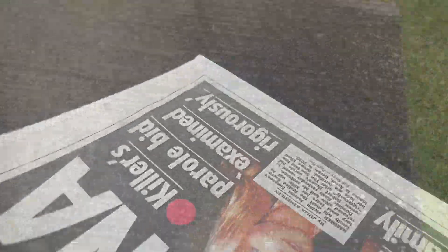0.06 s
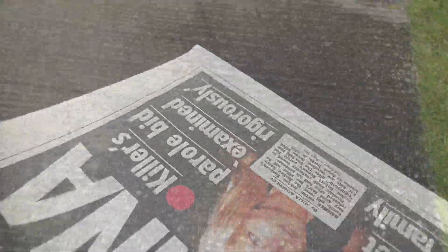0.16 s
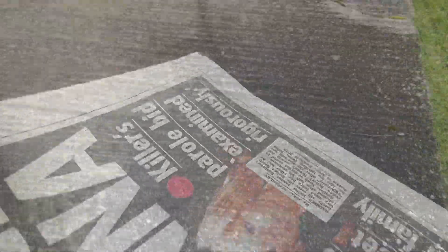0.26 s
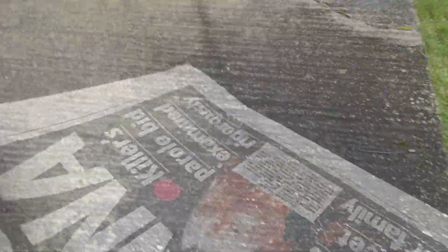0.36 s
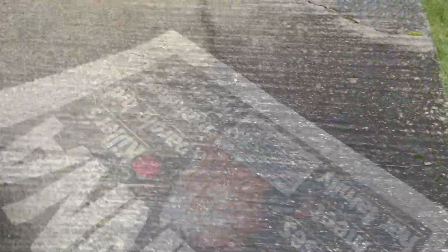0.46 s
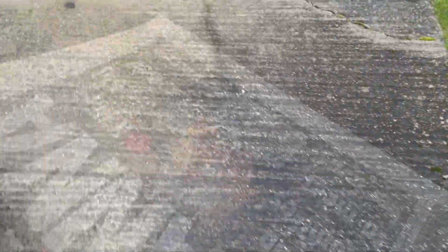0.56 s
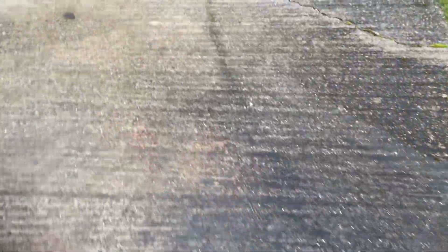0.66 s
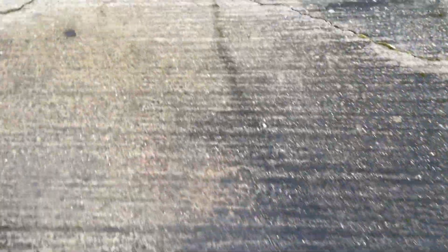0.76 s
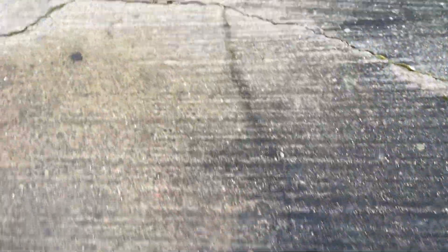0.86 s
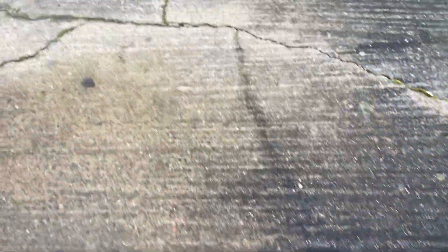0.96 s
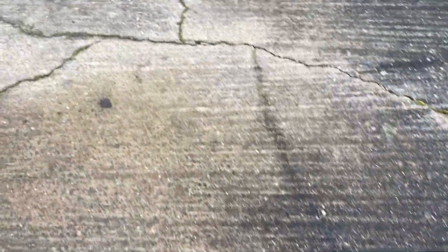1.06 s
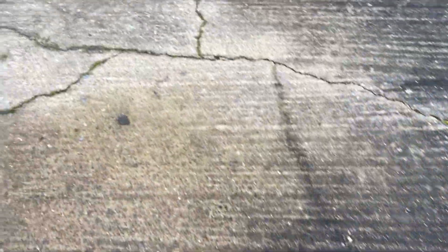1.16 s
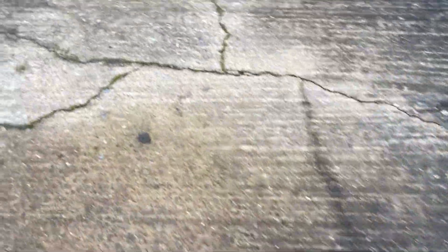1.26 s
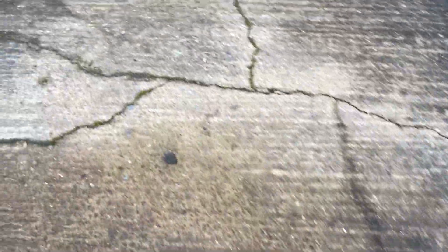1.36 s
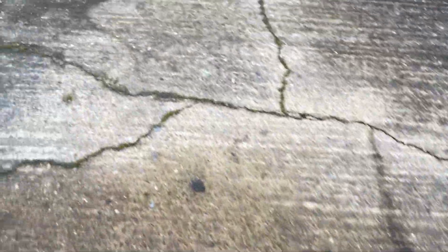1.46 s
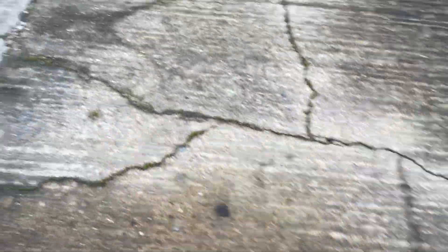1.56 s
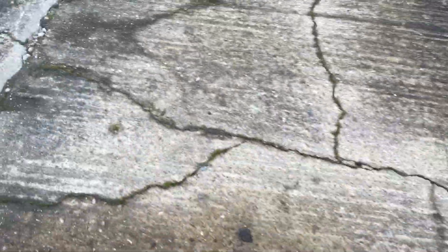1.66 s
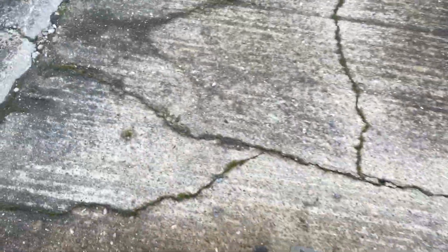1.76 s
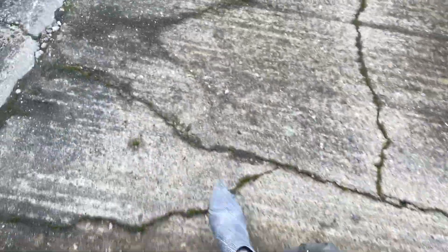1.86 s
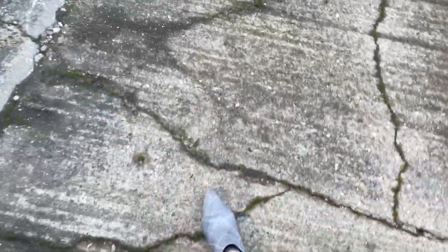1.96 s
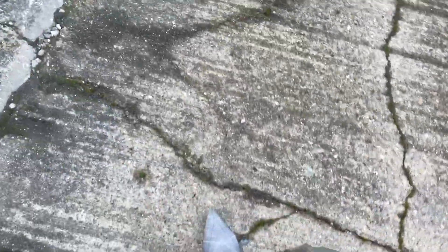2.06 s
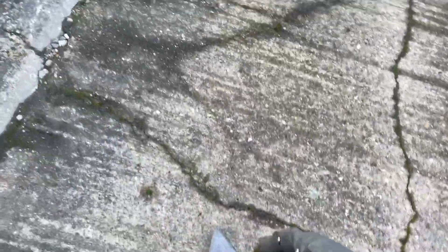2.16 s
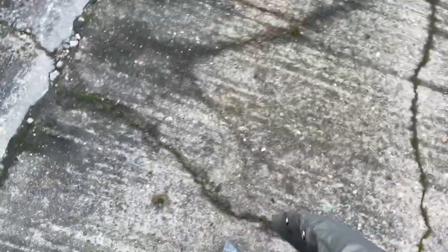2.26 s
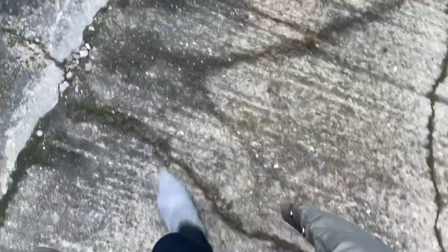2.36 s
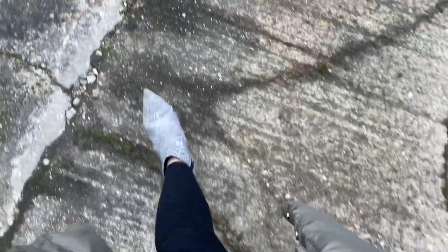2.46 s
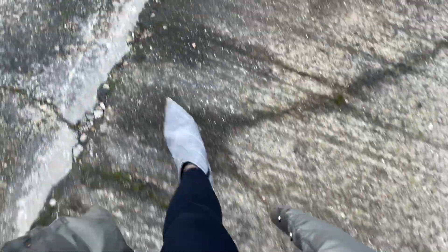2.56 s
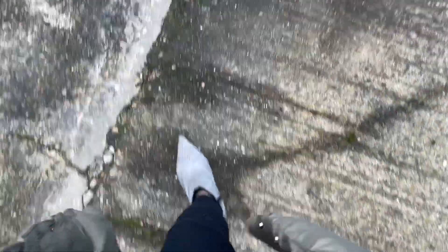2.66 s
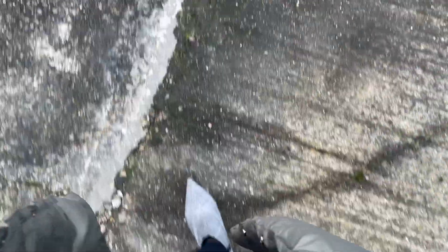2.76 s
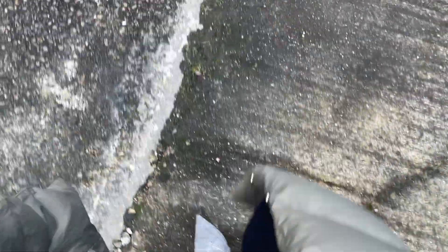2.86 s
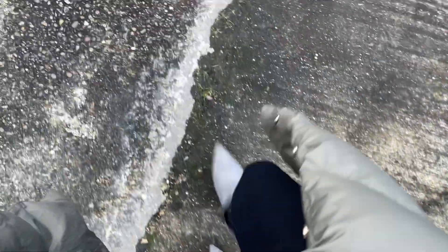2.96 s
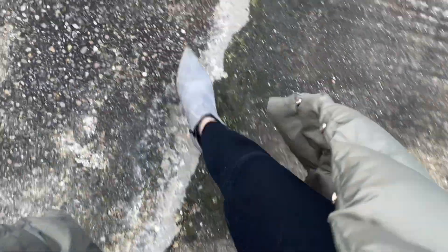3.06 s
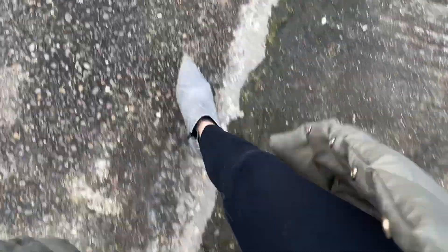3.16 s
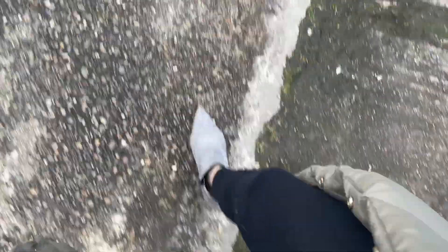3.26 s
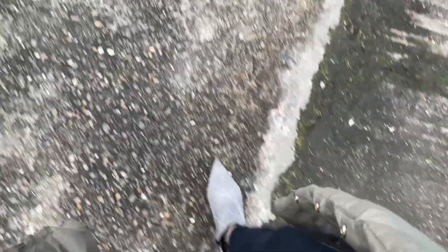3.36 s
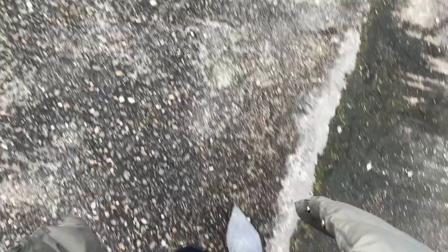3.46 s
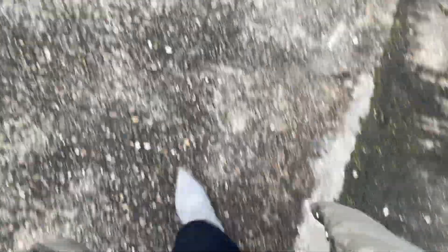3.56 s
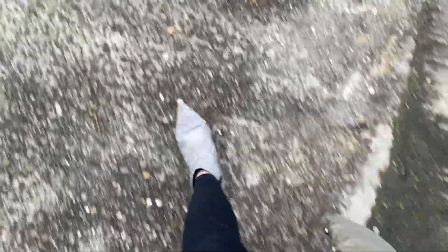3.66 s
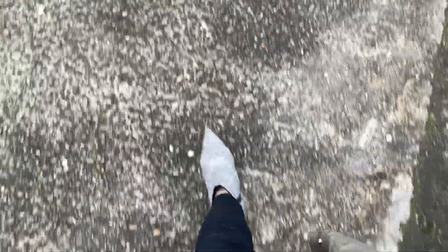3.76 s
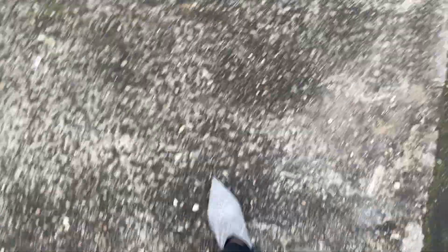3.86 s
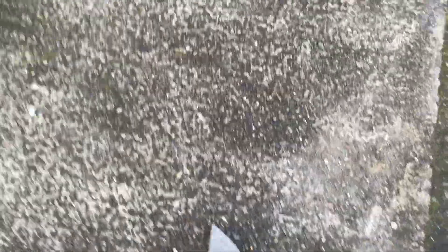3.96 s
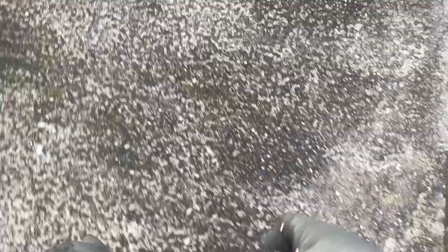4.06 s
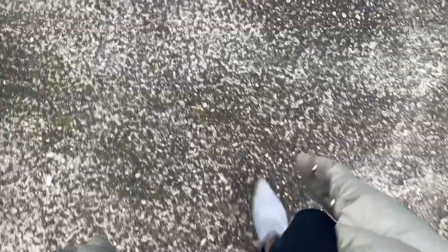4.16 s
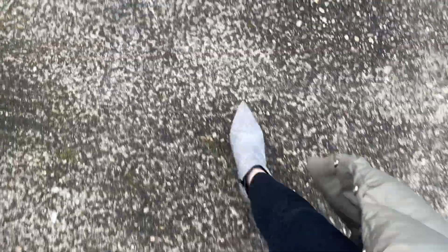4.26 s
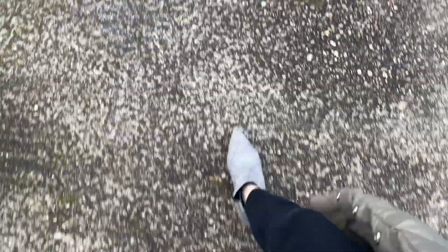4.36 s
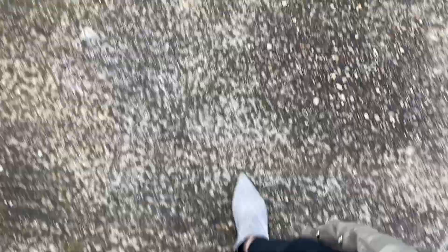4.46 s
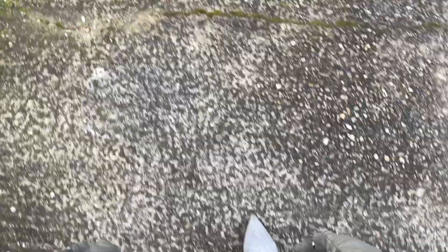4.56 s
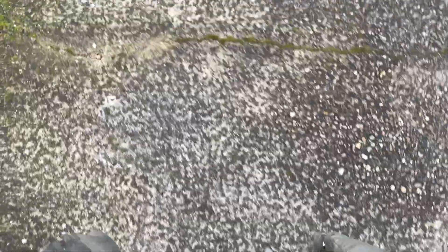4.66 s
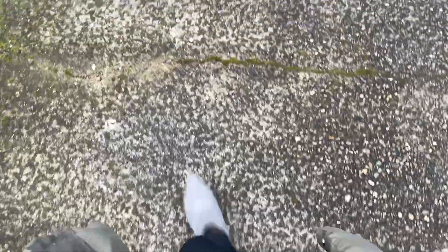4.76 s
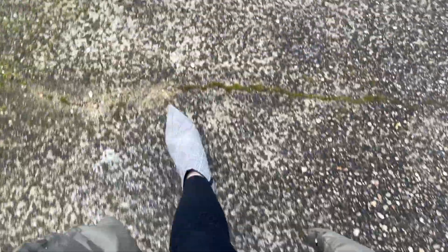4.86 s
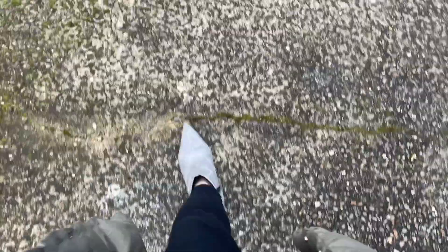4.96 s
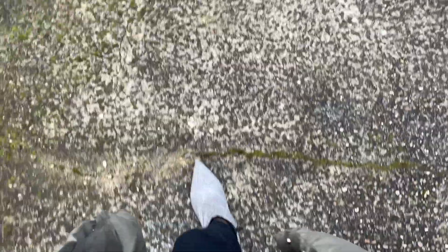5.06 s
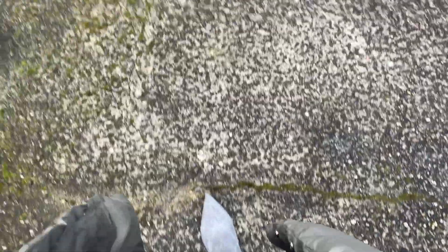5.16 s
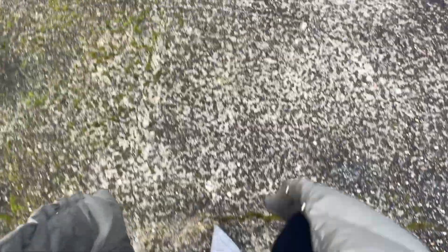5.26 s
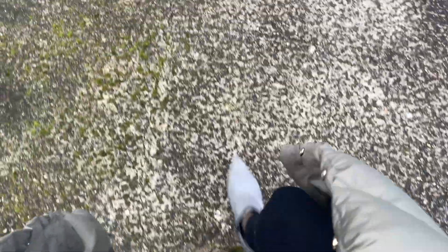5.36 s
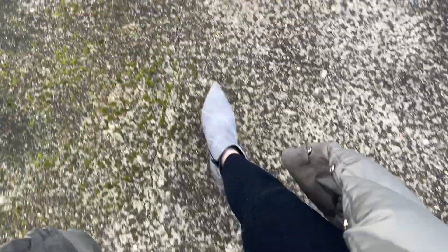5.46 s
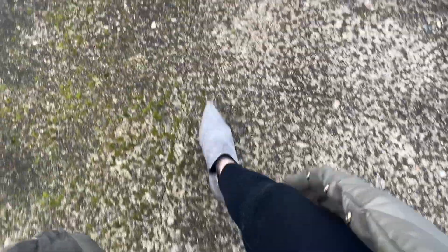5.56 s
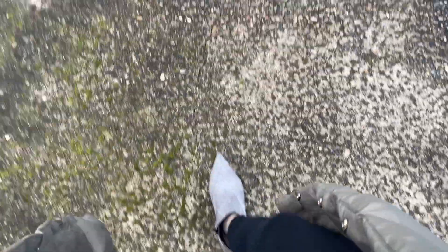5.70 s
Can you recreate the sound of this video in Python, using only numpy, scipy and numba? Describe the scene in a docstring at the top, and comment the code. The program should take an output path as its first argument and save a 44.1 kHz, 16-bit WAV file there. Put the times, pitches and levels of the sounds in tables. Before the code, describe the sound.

A walker in hard-heeled shoes crosses rough concrete outdoors, heard closely from a hand-held phone in stereo. Heel knocks fall at about 0.25, 0.7, 1.3, 1.9, 2.6, 3.15, 3.75, 4.3, 4.9 and 5.5 seconds: short hollow thuds sagging in pitch, with a crisp cracking edge, brighter on the left, and a faint brief echo. Those from 2.6 to 4.3 are strongest; the one at 4.9 is weak and the last is a scuffed cluster. Small grit ticks and sole scrapes follow, notably around 2.1 to 2.7 and 3.3. A padded nylon coat swishes crisply between steps, clearest near 1.3, 2.3, 2.7, 3.5, 3.9 and 4.6. Low wind rumbles and flutters throughout, buffeting most from 1.7 to 2.6, calmer around 4, returning near 4.5 and 5.6. A distant bird gives a thin falling whistle at 0.1 and a clearer two-part whistle from 4.1 to 4.4.

```python
"""Hard heels walk a concrete path amid a low rumble of wind and the swish of a padded coat, heard by a
hand-held phone. Each blow is a knock gliding down in pitch, a ring of the sole, a crack of damped modes and
grit, and decaying noise echoes; soles and grit tick as resonated clicks. The coat is crinkled noise in four
bands, the wind is band-passed noise swollen by buffets at two microphone ports, and a far bird whistles
twice in gliding sines, the second time in two parts."""
import sys
import numpy as np
from scipy import signal
from scipy.fft import rfft, irfft
from scipy.io import wavfile
from scipy.ndimage import uniform_filter1d
from numba import njit

SR = 44100
rng = np.random.default_rng(int(sys.argv[2]) if len(sys.argv) > 2 else 0)


def bounce(signal):
    """Save signal as a 16-bit WAV file at the path given by the first command-line argument."""
    frames = np.transpose(np.atleast_2d(signal))
    limited = np.clip(frames, -1, 1)
    pcm = np.round(limited * 32767).astype(np.int16)
    wavfile.write(sys.argv[1], SR, pcm)


N = 252693  # length in samples

# Heel blows, before the port gains: [t/s, knock level/dB, knock f/Hz at its peak,
# crack level/dB re knock, echo level/dB re knock, sole level/dB re knock]
HEEL_BLOWS = [(.1, -27.5, 526, -18, -14, -13), (0.13, -42, 610, -6, -9, -2),
              (.243, -17, 556, -18, -29, -10), (0.7137, -17, 554, -13, -15, -5),
              (1.3154, -14.5, 493, -16.5, -20, -18.5), (1.879, -43.5, 585, -2, -4, 8),
              (1.9185, -16, 529, -18, -23, -12.5), (1.9247, -19.5, 562, -23, -23, -6),
              (2.5718, -11.5, 533, -8.5, -17, -9), (3.1454, -13.5, 567, -14, -18.5, -5.5),
              (3.211, -31.5, 590, -8, -25, 2.5), (3.7353, -11, 575, -9, -17, -6.5),
              (3.7553, -30, 503, -20, -13, -25), (4.2956, -22, 500, -11, -3, -11),
              (4.302, -25.5, 500, -3.5, -25, 0), (4.3127, -11.5, 510, -15, -15.5, -13),
              (4.9042, -25.5, 560, -6, -34, -5), (4.9088, -29, 564, -6, -25, 3.5),
              (4.9246, -30.5, 544, -6, -34, -3), (5.4398, -27.5, 413, -17, -18, -10),
              (5.4991, -31.5, 550, -1, -3, -3), (5.507, -20.5, 570, -8.5, -19, -3),
              (5.5195, -18, 435, -15, -18, -6.5), (5.531, -32, 535, -20, -26, -12)]
# Modes of the heel tip, before detuning: [f/Hz, level/dB, t60/s]
TIP_MODES = [(1080, 2, 0.0092), (1325, 0, 0.007), (1660, 1.5, 0.0057), (2095, 2, 0.0072), (2556, 0, 0.0044),
             (3060, 0.5, 0.0039), (3700, -4, 0.0032), (4370, -15, 0.0034), (5540, -22, 0.0033)]
KNOCK_CYCLES, KNOCK_PEAK_CYCLES = 3.1, 1.55
KNOCK_SAG = .24  # fall of log frequency per cycle of the nominal pitch
SOLE_PITCH_SHARE, SOLE_START_CYCLES, SOLE_T60_S = .6, 2.7, .022
GRIT_DB, GRIT_T60_S, GRIT_HZ = -2, 0.012, (940, 3420)
CONTACT_S, CRACK_TOP_HZ = 0.00032, 4250  # a rubbery tip takes a moment to bite and dulls the crack
ECHO_START_S, ECHO_RISE_S, ECHO_HZ, ECHO_WIDTH_HZ = 0.013, 0.0063, 500, 485
ECHO_T60_S, ECHO_T60_S_PER_DB = 0.19, -0.0019  # t60 for a -16 dB knock; louder blows have shorter echoes
SHADOW_HZ = 680


def heel_knock(t, hz, sole_db):
    """Damped oscillation: a pressed tip glides down in pitch, then the released sole rings lower."""
    cycles = hz * t  # a lower knock lasts longer
    press = np.sin(np.pi * np.clip(cycles / KNOCK_CYCLES, 0, 1)) ** 1.3
    sagging_cycles = (1 - np.exp(-KNOCK_SAG * (cycles - KNOCK_PEAK_CYCLES))) / KNOCK_SAG
    knock = press * np.cos(2 * np.pi * sagging_cycles)
    after = np.maximum(t - SOLE_START_CYCLES / hz, 0)
    sole = np.sin(2 * np.pi * SOLE_PITCH_SHARE * hz * after) * 1000 ** (-after / SOLE_T60_S)
    return knock + undb(sole_db) * sole


def heel_crack(t):
    """Modal superposition: damped tip modes and crushed grit, softened by the finite contact time."""
    detune = 1 + 0.073 * rng.standard_normal(len(TIP_MODES))
    tip = 0
    for (hz, db, t60), factor in zip(TIP_MODES, detune):
        tip = tip + undb(db) * np.sin(2 * np.pi * hz * factor * t) * 1000 ** (-t / t60)
    grit_band = signal.butter(2, GRIT_HZ, "band", fs=SR)
    grit = signal.lfilter(*grit_band, rng.standard_normal(len(t)) * 1000 ** (-t / GRIT_T60_S))
    bite = 1 - np.exp(-(t / CONTACT_S) ** 2)
    return signal.lfilter(*signal.butter(4, CRACK_TOP_HZ, fs=SR), (tip + undb(GRIT_DB) * grit) * bite)


def heel_echo(t, knock_db):
    """Diffuse scattering: partly shared noise decays exponentially at both ports."""
    t60 = ECHO_T60_S + ECHO_T60_S_PER_DB * (knock_db + 16.0)
    noise = rng.standard_normal((3, len(t)))
    # uneven levels, each held for 128 samples
    noise = noise * undb(1.5 * rng.standard_normal(len(t) // 128 + 1)).repeat(128)[:len(t)]
    edges = [ECHO_HZ - ECHO_WIDTH_HZ / 2, ECHO_HZ + ECHO_WIDTH_HZ / 2]
    scatter = signal.lfilter(*signal.butter(3, edges, "band", fs=SR), noise[0] + 1.3 * noise[1:])
    return unit(scatter) * 1000 ** (-t / t60) * np.clip((t - ECHO_START_S) / ECHO_RISE_S, 0, 1)


def heels():
    """Impact and shadowing: each blow sums knock, crack and echo, and the shadowed port loses treble."""
    out, t = np.zeros((2, N)), np.arange(int(.3 * SR)) / SR
    shadow = signal.butter(1, SHADOW_HZ, fs=SR)
    for s, db, hz, crack_db, echo_db, sole_db in HEEL_BLOWS:
        knock = heel_knock(t, hz, sole_db)
        crack = undb(crack_db) * heel_crack(t)
        echo = undb(echo_db) * heel_echo(t, db)
        # the right port lies further off, in the shadow of the phone and the hand
        left = knock + crack
        right = 1.05 * signal.lfilter(*shadow, knock) + .55 * np.roll(crack, shift=5)
        add(out, undb(db) * (np.array([1.19 * left, 1.08 * right]) + echo), s)
    return out


# Soles, grit and coat creases: [t/s, peak level/dB before the phase shift, centre f/Hz,
# width of each filter pass as a share of centre, scrape t60/s, left minus right/dB]
SOLE_AND_GRIT_TICKS = [(.186, -43, 1300, .7, .01, 0), (0.3012, -34, 1240, 0.67, 0.014, 5),
                       (.304, -36, 1950, 0.5, .008, -1), (.689, -49, 900, .8, 0.04, -13),
                       (0.696, -43, 790, .8, 0.057, -10), (1.3865, -30, 1530, 0.47, 0.014, -1),
                       (1.389, -41, 2000, 0.5, .008, 0), (2.033, -46, 11500, .5, .02, 0),
                       (2.106, -33.5, 1490, 2.5, 0.0096, 2), (2.171, -57, 10500, 0.45, .01, 0),
                       (2.19, -41, 2800, 2.4, 0.012, -6), (2.259, -37.5, 820, 0.57, 0.074, -5),
                       (2.26, -34, 4500, 2.4, .006, 0), (2.577, -35, 1600, 1.1, 0.038, 7),
                       (2.638, -40, 2600, 0.56, .006, 0), (2.638, -32, 1240, 0.49, 0.02, -10),
                       (2.66, -44, 10000, .15, .015, -5), (2.918, -51, 11000, .3, .006, 0),
                       (2.943, -54, 10500, .4, .008, 0), (2.964, -47, 4200, .4, .004, 0),
                       (2.98, -38, 7500, 2., .004, 0), (2.996, -40, 6000, 2., .004, 4),
                       (3.043, -50, 11000, .4, .005, 0), (3.053, -50, 10500, .3, .006, 0),
                       (3.085, -54, 10500, .3, .006, 0), (3.098, -40, 9000, 1.8, .004, 1),
                       (3.146, -37, 3850, .25, 0.0045, 4), (3.3325, -28, 2730, 0.34, 0.0028, 9),
                       (3.3327, -49, 10000, .4, .004, 8), (3.339, -48, 10500, .5, .015, 0),
                       (3.3405, -46, 3700, .5, .02, 0), (3.348, -34.5, 2880, 0.23, 0.0048, -5),
                       (3.3725, -48, 11000, .25, .012, 0), (3.702, -35, 2400, 0.7, .006, -4),
                       (3.7025, -38, 620, 0.91, 0.036, -5), (3.736, -35, 4160, .3, 0.0037, 2),
                       (3.751, -37, 4000, .6, .005, 0), (4.313, -36.5, 3650, 0.28, .005, 8),
                       (4.319, -36, 2900, .7, .012, 4), (3.781, -44, 1900, .4, .005, 0),
                       (4.33, -45, 1900, .4, .01, 0), (4.374, -35, 1000, 1.2, .01, 4),
                       (5.335, -53, 12500, .3, .01, 0), (5.4384, -37, 2530, 0.37, .004, 7),
                       (5.4386, -43.5, 4970, 0.17, .004, 7), (5.4416, -37, 2180, .4, 0.0045, 8),
                       (5.451, -43, 2380, 0.59, 0.049, 5), (5.499, -39.5, 3300, 0.54, 0.035, 3),
                       (5.504, -37, 3400, .5, .008, 9), (5.512, -41, 3600, 0.41, 0.035, 7)]


def ticks():
    """Resonance: a click and a brief scrape excite one broad band, phase-shifted between the ports."""
    out, t = np.zeros((2, N)), np.arange(int(.06 * SR)) / SR
    for s, db, hz, width, t60, pan_db in SOLE_AND_GRIT_TICKS:
        scrape = rng.standard_normal(len(t)) * 1000 ** (-t / t60)
        scrape[0] = 6.1  # the click
        burst = resonate(scrape, np.full(len(t), 1. * hz), 1. * width, passes=2)
        port_gains = undb([db + pan_db / 2, db - pan_db / 2])
        add(out, np.outer(port_gains, burst / np.abs(burst).max()), s)
    lead = over_log_hz(PORT_LEAD, np.fft.rfftfreq(N, 1 / SR) + 1)
    return irfft(rfft(out) * np.exp(.5j * np.outer([1, -1], lead)), N)


# Colour of the coat noise: [f/Hz, relative spectral level/dB]
COAT_SPECTRUM = [(150, -34), (250, -5), (330, -4), (800, -5), (1210, -6.5), (2100, -4), (3060, -4.5),
                 (7020, -12), (8320, -21), (10200, -17), (12100, -21), (13800, -19), (14500, -43),
                 (16000, -50)]
# Brightness of the rub: [t/s, gain of the upper half and loss of the lower half of the mid band/dB]
RUB_BRIGHTNESS = [(0, 6.5), (.15, 0.5), (.45, -2), (.9, 0.5), (1.08, -3.5), (1.25, -3.5), (1.4, 0.5),
                  (2.3, 0), (2.52, -0.5), (2.7, 0.5), (3.08, -0.5), (3.6, 1), (3.8, 0), (4.1, 1),
                  (4.45, 0.5), (4.7, 0), (4.85, -1), (5.3, 1.5), (5.73, 0)]


def coat():
    """Friction noise: nylon sliding on nylon, and soles scuffing after the blows, crinkle in four overlapping
    bands, each with its own flicker."""
    top_db, mid_db, low_db = coat_levels()
    hz = np.fft.rfftfreq(N, 1 / SR) + 1
    colour = undb(over_log_hz(COAT_SPECTRUM, hz))
    low, top = 1 / (1 + (hz / 1100.) ** 4), 1 / (1 + (8200. / hz) ** 8)  # shares of power
    mid, upper = 1 - low - top, 1 / (1 + (3400. / hz) ** 6)
    tilt_db, = curve(RUB_BRIGHTNESS)
    bands = ((low, low_db),
             (mid * (1 - upper), mid_db - 1.9 - tilt_db),
             (mid * upper, mid_db - 5.5 + tilt_db),
             (top, top_db))
    out, common_flicker_db = 0, 1.2 * walk(30)
    for share, db in bands:
        crinkle = undb(1.44 * rng.exponential(size=N // 24 + 1)).repeat(24)[:N]
        noises = crinkle * rng.standard_normal((3, N))
        band = unit(at_ports(*noises, colour * np.sqrt(np.clip(share, 0, 1))))
        out = out + band * undb(db + common_flicker_db + 1.1 * walk(16))
    return out


# Swishes of sleeve and hem, and scuffs of the soles rolling after the blows (the rows heavy in mid and low); #
# rise and fade each span 20 dB: [t/s where the hold starts, top band level/dB, # mid band level/dB re top, low
# band level/dB re top, rise/s, hold/s, fade/s]
SWISHES_AND_SCUFFS = [(0.007, -64.5, 7.5, 10.5, 0.096, 0.034, 0.095),
                      (0.19, -68.5, 10.5, 16.5, 0.2, 0.062, 0.056), (0.302, -62, 6.5, 11.5, 0.15, 0.011, 0.37),
                      (0.71, -69.5, 9.5, 13.5, 0.51, 0.078, 0.042), (0.757, -63.5, 7, 11.5, 0.22, 0.0094, 0.7),
                      (1.04, -58, 5.5, -15, 0.045, 0.041, 0.25), (1.17, -75.5, 15.5, 19, 1, 0.12, 0.23),
                      (1.272, -54.5, -4, 2.5, 0.042, 0.0094, 0.23), (1.409, -70, 17, 22.5, 0.33, 0.057, 0.05),
                      (1.539, -63, 8.5, 11, 0.21, 0.1, 0.15), (1.962, -66.5, 13.5, 19.5, 0.081, 0.0042, 0.21),
                      (2.032, -63, 6, 11.5, 0.56, 0.002, 0.14), (2.198, -65.5, 7, 15, 0.29, 0.001, 0.46),
                      (2.256, -53, 5.5, 3, 0.02, 0.041, 0.21), (2.426, -74.5, 4, 11, .2, .03, 0.22),
                      (2.49, -62.5, 2.5, 3, 0.038, 0.027, 0.068), (2.607, -58.5, 8.5, 14, 0.11, 0.042, 0.48),
                      (2.729, -55, 6.5, -5, 0.21, 0.033, 0.18), (2.98, -69, 5, -4, .25, .04, 0.22),
                      (3.09, -62.5, 10, 12.5, 0.11, 0.032, 0.2), (3.201, -58, 9.5, 10, 0.028, 0.042, 0.14),
                      (3.338, -67, 10.5, 15.5, 0.23, 0.018, 0.15), (3.471, -50.5, 4.5, 2.5, 0.032, 0.043, 0.12),
                      (3.66, -65, 11.5, 0, 0.92, 0.064, 0.42), (3.81, -63.5, 9.5, 17, 0.66, 0.034, 0.57),
                      (3.914, -54.5, 4.5, -0.5, 0.16, 0.054, 0.23), (4.132, -66, -11, -9, 0.033, 0.0074, 0.036),
                      (4.295, -64.5, 8.5, 4, 0.014, 0.13, 0.043), (4.415, -64.5, 9, 12, 0.34, 0.001, 0.75),
                      (4.622, -53, 7, 0, 0.059, 0.055, 0.13), (4.877, -57, -1, -10, 0.088, 0.017, 0.2),
                      (5.025, -64.5, 15.5, 18.5, 0.49, 0.022, 0.09), (5.075, -62, 8.5, 10, 0.035, 0.16, 0.26),
                      (5.52, -66.5, 6.5, 12, 0.2, 0.002, 0.053), (5.606, -66, 11.5, 13, 0.16, 0.034, 0.31)]
# Rustle between swishes: [top band level/dB, mid band level/dB re top, low band level/dB re top]
COAT_REST = (-84, -12, 10.5)


def coat_levels():
    """Energy addition: swishes rise, hold and fade over a faint rustle, as top, mid and low band dB."""
    t = np.arange(0, N, 64) / SR
    rest_db, rest_mid_db, rest_low_db = COAT_REST
    shapes = []
    for s, db, _, _, rise, hold, fade in SWISHES_AND_SCUFFS:
        slope = np.maximum((s - t) / rise, (t - s - hold) / fade)
        shapes.append(db - 20 * np.maximum(slope, 0))
    swishes = np.array(SWISHES_AND_SCUFFS)
    levels = []
    for rest_re_db, swish_re_db in ((0, np.zeros(len(swishes))),
                                    (rest_mid_db, swishes[:, 2]),
                                    (rest_low_db, swishes[:, 3])):
        band_db = power_sum([rest_db + rest_re_db] + [x + re for x, re in zip(shapes, swish_re_db)])
        levels.append(np.interp(np.arange(N) / SR, t, band_db))
    return levels


# Slowly swelling wind under the buffets, before the gusting:
# [t/s, rumble level/dB, flutter level/dB, flutter centre f/Hz]
WIND_SWELL = [(0, -51, -57, 157), (.43, -56, -61.5, 157), (.75, -44.5, -56, 158), (1.2, -51.5, -55, 155),
              (1.65, -51, -61, 149), (1.9, -42.5, -51.5, 142), (2.3, -37, -46.5, 147),
              (2.45, -35.5, -54, 145), (2.6, -39, -47, 149), (2.72, -50.5, -53.5, 160),
              (3.05, -48.5, -51.5, 157), (3.32, -43, -46, 163), (3.45, -52.5, -56, 156),
              (4.0, -51, -52, 162), (4.29, -53.5, -50.5, 178), (4.53, -46.5, -47, 174),
              (4.9, -48.5, -49.5, 185), (5.36, -46, -54, 196), (5.57, -41, -45, 192), (5.73, -60, -51, 167)]
# Buffets on the ports: [peak t/s, level/dB, time from peak to -6 dB/s, flutter level/dB re buffet]
WIND_BUFFETS = [(0.361, -45, .02, -14), (0.64, -37, 0.032, -34), (0.925, -43, 0.036, -6.5),
                (1.11, -36.5, 0.028, -24), (1.31, -33.5, 0.026, -8), (1.381, -35, 0.019, -15),
                (1.562, -45, 0.028, -4.5), (1.731, -30, 0.027, -22), (1.811, -30.5, 0.027, -28),
                (1.95, -28.5, 0.048, -28), (1.993, -31.5, 0.014, -31), (2.106, -26, 0.0083, -19),
                (2.374, -26, 0.0096, -8), (2.433, -28, 0.031, -13.5), (2.539, -25, 0.012, -21),
                (3.109, -37, 0.017, -15), (3.282, -33.5, 0.017, -1), (3.332, -37, 0.026, -17),
                (3.737, -51, 0.041, -3), (4.505, -35.5, 0.041, -20), (4.566, -35, 0.012, -26),
                (4.817, -37, 0.0083, -11), (4.976, -36, 0.012, -20), (5.165, -45, 0.033, -1),
                (5.28, -47, 0.012, -3), (5.365, -41, .025, -17), (5.568, -29.5, 0.02, -11.5),
                (5.723, -34.5, 0.071, -9)]
RUMBLE_HZ, RUMBLE_SAG_HZ_PER_DB = 63.1, 0.05  # centre at -45 dB; stronger eddies are larger and lower


def wind():
    """Turbulence: eddies give a rumble of wandering centre and a quicker flutter above; buffets swell both."""
    t = np.arange(N) / SR
    swell_db, swell_flutter_db, flutter_hz = curve(WIND_SWELL)
    bumps = [(peak_db - 6 * ((t - s) / half) ** 2, re_db) for s, peak_db, half, re_db in WIND_BUFFETS]
    rumble_db = power_sum([swell_db] + [bump for bump, _ in bumps])
    flutter_db = power_sum([swell_flutter_db] + [bump + re_db for bump, re_db in bumps])
    rumble_hz = RUMBLE_HZ - RUMBLE_SAG_HZ_PER_DB * (rumble_db + 45.0)
    rumble = [resonate(x, rumble_hz, 1.22, passes=3) for x in rng.standard_normal((3, N))]
    wavering_hz = flutter_hz * undb(.5 * walk(3))
    flutter = [resonate(x, wavering_hz, 0.79, passes=3) for x in rng.standard_normal((3, N))]
    gust = undb(rumble_db) * unit(at_ports(*rumble, 1))
    gust = gust + undb(flutter_db) * unit(at_ports(*flutter, 1))
    return gust * undb(1.73 * walk(30))


# Far bird, one glide a sub-table, before wavering and port gains: [t/s, f/Hz, RMS level/dB]
BIRD_GLIDES = [
    [(.05, 2320, -70), (.09, 2290, -67), (.11, 2215, -66), (.155, 2110, -70), (.21, 2070, -73)],
    [(4.137, 2075, -61.5), (4.18, 2080, -64.5)],
    [(4.183, 2090, -64), (4.24, 2155, -63), (4.32, 2180, -64), (4.37, 2110, -63), (4.4, 1970, -61),
     (4.43, 1830, -63)],
]


def bird():
    """Frequency modulation: thin sine whistles glide and waver in level and pitch."""
    out = np.zeros((2, N))
    for glide in BIRD_GLIDES:
        hz, db = curve(glide)
        span = slice(int(glide[0][0] * SR), int(glide[-1][0] * SR))
        level = np.sqrt(2) * undb(db + 2.5 * walk(35))
        tone = level * np.sin(2 * np.pi * np.cumsum(hz + 18 * walk(40)) / SR)
        fade = signal.windows.tukey(span.stop - span.start, .2)
        out[:, span] += tone[span] * fade * np.array([[1.2], [.8]])
    return out


# Likeness of the two ports: [f/Hz, shared fraction of power 0-1]
PORT_LIKENESS = [(40, .9), (150, .8), (400, .55), (1000, .2), (2500, .3), (5000, .5), (8000, .85),
                 (15000, .9)]
# Phase between the ports: [f/Hz, lead of the left/rad]
PORT_LEAD = [(20, 0), (400, .4), (2500, 1.5), (4000, 0), (6700, -1.2), (8000, -3.1), (11000, -6.2),
             (14000, -9.2), (16000, -11.2)]
# Level between the ports: [f/Hz, left minus right/dB]
PORT_TILT = [(60, 1), (300, 0), (1000, -1), (2400, 0.5), (4400, 3.5), (8000, -0.5), (15000, 0.5)]


def at_ports(shared, left, right, gain):
    """Partial coherence: two ports hear a phase-shifted shared part and their own; gain is per frequency."""
    hz = np.fft.rfftfreq(N, 1 / SR) + 1
    like = np.clip(over_log_hz(PORT_LIKENESS, hz), 0, 1)
    lead, tilt_db = over_log_hz(PORT_LEAD, hz), over_log_hz(PORT_TILT, hz)
    sign = np.array([[1], [-1]])  # left, right
    common = np.sqrt(like) * rfft(shared) * np.exp(.5j * sign * lead)
    both = common + np.sqrt(1 - like) * rfft([left, right])
    return irfft(both * gain * undb(sign * tilt_db / 2), N)


@njit
def svf(x, hz, damping):
    """Resonance: a state-variable band-pass with a moving centre, gain 1 there."""
    y, band, low = np.empty(len(x)), 0., 0.
    for i in range(len(x)):
        g = np.tan(np.pi * hz[i] / SR)
        v = (band + g * (x[i] - low)) / (1 + g * (g + damping))
        band, low, y[i] = 2 * v - band, low + 2 * g * v, damping * v
    return y


def resonate(x, hz, damping, passes):
    """Cascading: repeated passes of one resonance steepen its skirts."""
    for _ in range(passes):
        x = svf(x, hz, damping)
    return x


def walk(rate):
    """Random modulation: levels held 1 / rate s and slewed twice, with unit RMS."""
    k = int(SR / rate)
    steps = np.repeat(rng.standard_normal(N // k + 1), k)
    return unit(uniform_filter1d(uniform_filter1d(steps, k), k)[:N])


def undb(db):
    """Decibel law: level in dB to amplitude."""
    return 10 ** (np.asarray(db) / 20)


def unit(x):
    """Normalisation: scale to unit RMS."""
    return x / np.sqrt(np.mean(x ** 2))


def power_sum(dbs):
    """Incoherent addition: level in dB of unrelated sounds heard together."""
    return 10 * np.log10(sum(undb(db) ** 2 for db in dbs))


def curve(table):
    """Linear interpolation: columns of a table in time, sample by sample."""
    s, *columns = np.transpose(table)
    return [np.interp(np.arange(N) / SR, s, c) for c in columns]


def over_log_hz(table, hz):
    """Logarithmic frequency scale: interpolate a table over log frequency."""
    table_hz, values = np.transpose(table)
    return np.interp(np.log(hz), np.log(table_hz), values)


def add(out, x, s):
    """Superposition: mix x into out from time s."""
    i = int(s * SR)
    out[:, i:i + x.shape[-1]] += x[..., :N - i]


def scene():
    """Superposition: all sources sum at the two ports."""
    return heels() + ticks() + coat() + wind() + bird()


def record(dry):
    """Band limiting: the phone rolls off the deep bass and cuts the top."""
    wet = signal.sosfilt(signal.butter(2, 34., "high", fs=SR, output="sos"), dry)
    return signal.sosfilt(signal.ellip(10, .2, 70, 15800, fs=SR, output="sos"), wet)


dry = scene()
out = record(dry)
bounce(out)
```